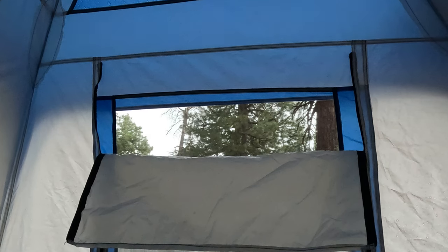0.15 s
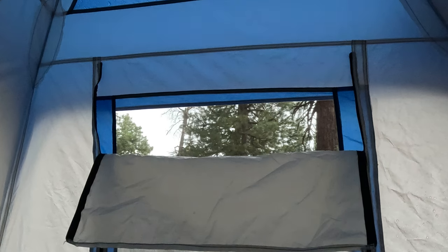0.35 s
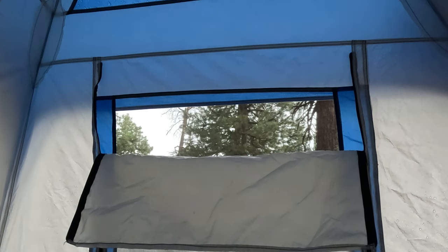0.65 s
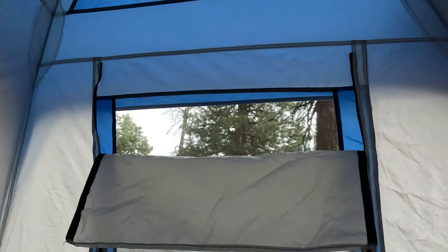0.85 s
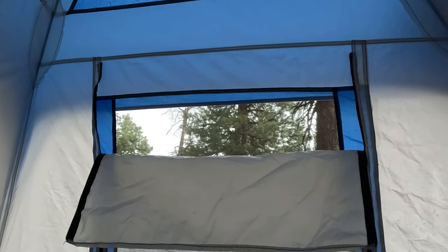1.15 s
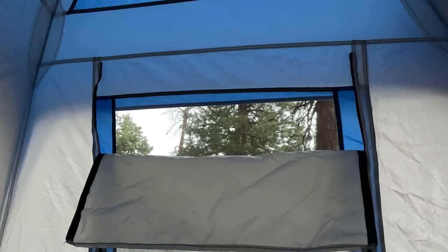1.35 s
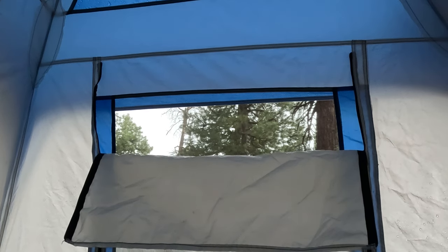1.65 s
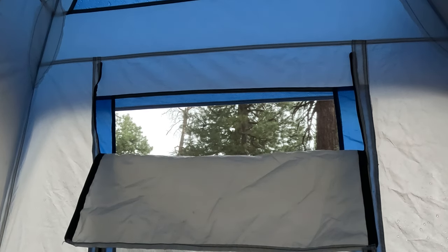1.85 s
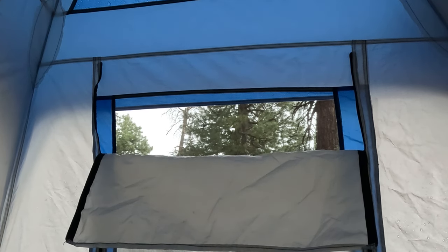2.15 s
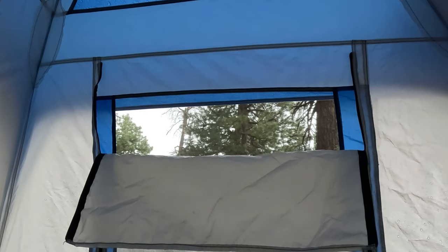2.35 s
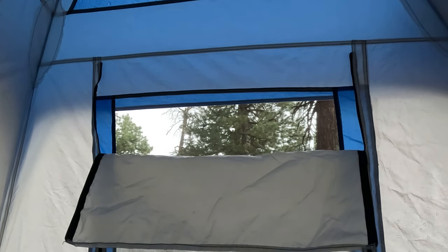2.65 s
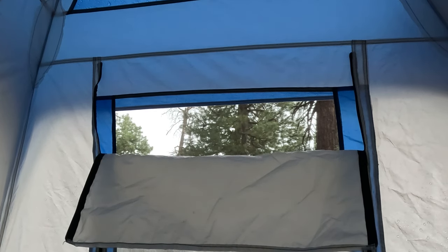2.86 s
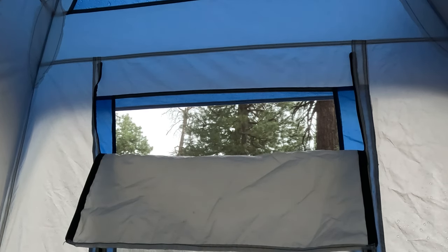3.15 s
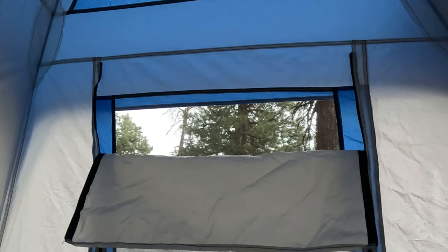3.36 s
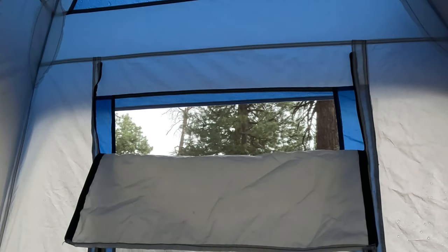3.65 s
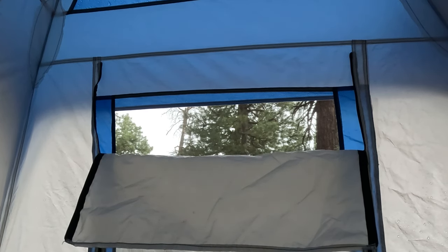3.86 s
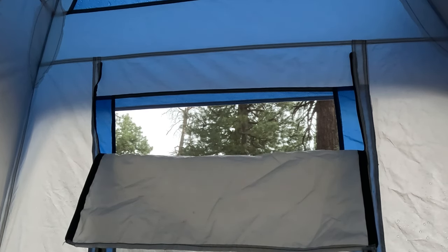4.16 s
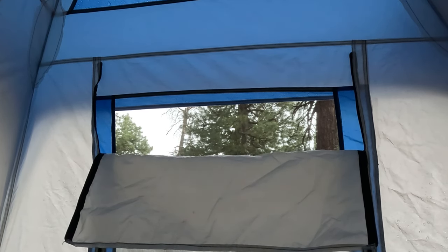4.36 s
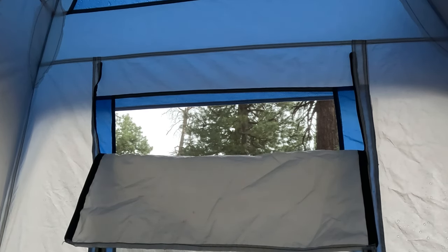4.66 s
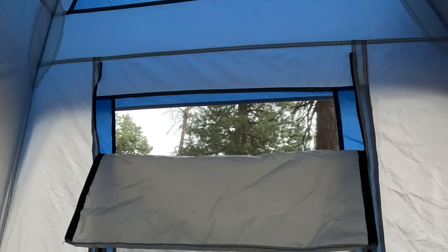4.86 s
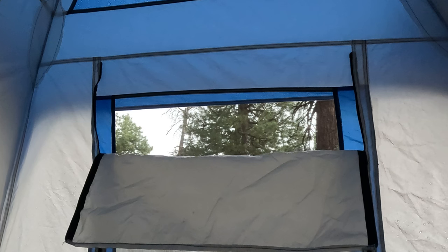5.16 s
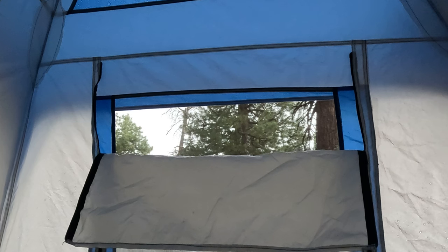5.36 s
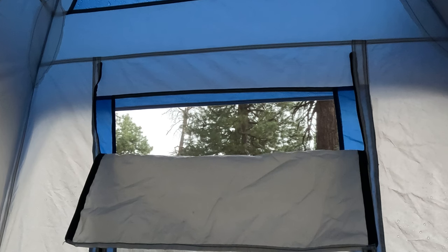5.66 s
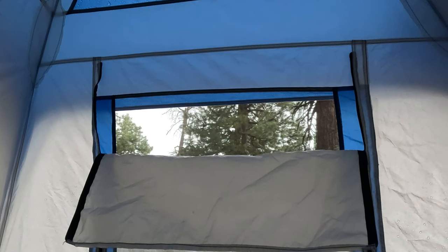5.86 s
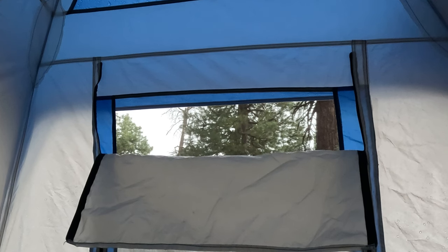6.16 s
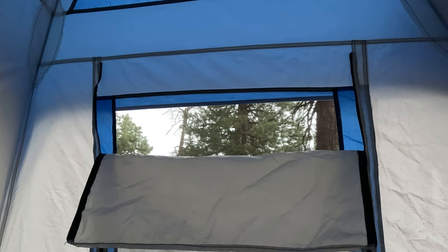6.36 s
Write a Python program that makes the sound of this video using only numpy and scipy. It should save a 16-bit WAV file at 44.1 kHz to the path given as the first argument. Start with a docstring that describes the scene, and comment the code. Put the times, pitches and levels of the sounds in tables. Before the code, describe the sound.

A violent close thunderclap cracks and tears almost at once, then booming peals roll on and slowly dull away while light rain ticks on tent fabric.

```python
"""A close thunderclap inside a tent in a forest, over a low roll and the hiss of fine rain present from the start.
Shock fronts thump and snap; a ragged stream of shocks from the nearest channel stretch tears. The roll lulls briefly.
Peal after peal follows from ever further away: filtered shock volleys, dulled by air and scattered by trees.
Noise ticks with a short ring are drops on the fabric: small ones at random throughout, big ones in the later part."""
import sys
import numpy as np
from scipy import signal
from scipy.fft import rfft, irfft, next_fast_len
from scipy.io import wavfile
from scipy.ndimage import uniform_filter1d, minimum_filter1d, map_coordinates

SR = 44100
rng = np.random.default_rng(int(sys.argv[2]) if len(sys.argv) > 2 else 0)


def pcm_store(signal):
    """Save signal as 16-bit PCM."""
    levels = np.round(np.clip(np.atleast_2d(signal), -1, 1) * 32767)
    wavfile.write(sys.argv[1], SR, levels.astype(np.int16).T)


N = 287091
TIME_S = np.arange(N) / SR

# single shock fronts: start_s, thump_db (peak), thump_hz, swell_s (time to peak), snap_db (peak)
FRONTS = [(0.1697, 5, 258, 0.0025, -4), (0.176, 6, 226.0, 0.0024, 0), (0.24, -12, 250.0, 0.0046, -17),
          (0.264, -7.5, 320.0, 0.0045, -23.0), (0.279, -11.1, 560.0, 0.002, -12.0),
          (0.285, -10, 370.0, 0.0018, -24.0), (0.347, -7, 250.0, 0.002, -23.0),
          (0.383, -11, 560.0, 0.0038, -13.0), (0.4136, -1, 256.0, 0.0061, -16),
          (0.51, -7.5, 540, 0.0018, -19.0), (1.036, -14, 270.0, 0.0052, -23.0),
          (1.13, -14, 313, 0.006, -19), (1.298, -6, 304, 0.0045, -19), (1.327, -5, 310.0, 0.0045, -14),
          (1.603, -11, 560.0, 0.002, -16), (1.7, -11, 310.0, 0.006, -22.0),
          (1.702, -9, 560.0, 0.002, -22.0), (1.703, -18.5, 70, 0.01, -28), (1.72, -10, 330.0, 0.006, -18),
          (1.735, -9.5, 270.0, 0.0072, -31.0), (1.853, -10, 308, 0.006, -20),
          (1.866, -16.5, 557, 0.0052, -20), (1.874, -3.5, 342, 0.0013, -13),
          (1.969, -5.5, 390.0, 0.0017, -20), (2.187, -13.5, 299, 0.0071, -30),
          (2.301, -13.0, 270.0, 0.0066, -20), (2.311, -12, 566, 0.0024, -23.0),
          (2.318, -10.5, 300.0, 0.0074, -31.0), (2.331, -10, 310.0, 0.0028, -23.0),
          (2.724, -11, 322, 0.0051, -23.0), (3.039, -13, 328, 0.0066, -25.0),
          (3.187, -15, 310.0, 0.0051, -27), (3.269, -12.0, 333, 0.0069, -21),
          (3.508, -12, 310.0, 0.0066, -22), (3.533, -9, 319, 0.006, -21.0), (3.584, -6, 308, 0.003, -23),
          (3.633, -7.5, 320.0, 0.006, -20), (3.67, -15, 636, 0.005, -26), (3.682, -10, 317, 0.006, -31.0),
          (3.694, -13.5, 290.0, 0.006, -29), (3.745, -10.5, 675, 0.0058, -22),
          (3.759, -10.5, 306, 0.006, -22.5), (4.004, -12, 301, 0.006, -22.0), (4.017, -18, 89, 0.014, -35),
          (4.018, -10.3, 385, 0.0069, -30.0), (4.025, -13, 557, 0.0017, -23),
          (4.031, -8, 280.0, 0.0014, -22), (4.053, -14, 413, 0.0068, -33.0), (4.066, -8, 343, 0.006, -26),
          (4.078, -11, 563, 0.0013, -35.0), (4.079, -10, 350.0, 0.0045, -33),
          (4.154, -6.5, 302, 0.0045, -27), (4.198, -10.5, 283, 0.0082, -25),
          (4.199, -9.5, 560.0, 0.0018, -31.0), (4.211, -11.5, 383, 0.006, -27.0),
          (4.258, -17, 700, 0.003, -24), (4.375, -7.5, 315, 0.0045, -33), (4.564, -16, 630, 0.0039, -27),
          (4.579, -7.5, 300.0, 0.006, -21), (4.588, -11, 560.0, 0.0017, -20), (4.592, -16, 80, 0.013, -35),
          (4.596, -9, 300.0, 0.0075, -20.0), (4.638, -8, 377, 0.0049, -27), (4.645, -12, 139, 0.008, -29),
          (4.743, -5, 373, 0.0038, -31), (4.788, -9.5, 354, 0.006, -21), (4.982, -9, 320.0, 0.0035, -25),
          (5.1, -13.0, 349, 0.0067, -26), (5.115, -11.5, 320.0, 0.006, -33.0),
          (5.248, -20, 560.0, 0.0028, -21.0), (5.249, -7.5, 330.0, 0.002, -20),
          (5.264, -12.9, 362, 0.006, -18.0), (5.324, -17.5, 301, 0.0071, -29),
          (5.671, -13.5, 391, 0.0069, -30), (5.826, -11.5, 310.0, 0.0045, -28)]

# tearing crack from the nearest channel stretch; relative colour: freq_hz, density_db (per Hz)
TEAR_COLOUR = [(18, -54), (30, -26.5), (70, -7.5), (97, -1.5), (141, -1), (245, -5), (315, -5.5),
               (388, -5.5), (456, -11), (574, -7), (616, -9), (793, -16), (1200, -14.5), (2140, -18),
               (5140, -33), (7430, -46), (9100, -60), (10800, -53), (13400, -73)]
TEAR_START_S, TEAR_END_S = 0.183, 0.423
TEAR_DB, TEAR_SWELL_DB = -16, 0.5

# peals, each a bunch of shocks from one bend of the channel; levels before scaling by length:
# start_s, length_s, boom_hz, bass_db, boom_db, crackle_db, sizzle_db
PEALS = [(0.619, 0.01, 310.0, -35.0, -16, -27.0, -37), (0.789, 0.014, 275.0, -22, -24, -34, -47.0),
         (0.84, 0.0053, 295.0, -34, -16, -29, -48.0), (1.272, 0.059, 315.0, -26, -19.5, -31.0, -43.5),
         (1.539, 0.01, 298, -30.5, -16.5, -35, -42), (1.6, 0.017, 300.0, -21, -16, -30, -39),
         (1.714, 0.076, 310.0, -35.5, -18, -33, -44), (1.804, 0.057, 330.0, -40.0, -22.5, -25.5, -40.5),
         (1.867, 0.0046, 335.0, -34.0, -16.0, -15, -39.0), (1.875, 0.018, 330.0, -27, -16.5, -29.0, -39),
         (1.96, 0.027, 360, -28.5, -18, -23.5, -46.5), (2.063, 0.01, 320.0, -40.0, -20, -36, -43.0),
         (2.076, 0.02, 335.0, -38, -20.5, -26, -43.5), (2.188, 0.032, 300.0, -42, -23.5, -30, -55),
         (2.3, 0.0132, 340.0, -25.5, -17, -27.5, -43.5), (2.316, 0.048, 320.0, -42.0, -21, -33, -42),
         (2.382, 0.029, 340.0, -27, -22.5, -29, -45.5), (2.467, 0.01, 365.0, -43, -15.5, -42, -59),
         (2.597, 0.066, 305.0, -38.5, -23.5, -35.0, -55.0), (2.687, 0.011, 285.0, -30, -29, -30.5, -56),
         (2.878, 0.011, 330.0, -40, -21.5, -32, -48.5), (3.037, 0.034, 335.0, -28, -24, -29.5, -50.5),
         (3.163, 0.034, 345.0, -28, -19, -36.5, -60), (3.267, 0.039, 330.0, -42, -21.5, -30.5, -55),
         (3.391, 0.021, 337, -31.0, -20.5, -40.0, -60), (3.41, 0.042, 375.0, -41.0, -28, -29.5, -61),
         (3.496, 0.048, 325.0, -34, -17.5, -31, -57), (3.59, 0.01, 355.0, -21.5, -29, -40.0, -60.0),
         (3.618, 0.006, 360.0, -34, -13.5, -41.5, -50), (3.668, 0.027, 340.0, -40.5, -19, -33, -60.5),
         (3.694, 0.024, 315.0, -20.5, -23.5, -42, -60.0), (3.745, 0.031, 330.0, -26.5, -20, -28, -48.5),
         (3.848, 0.048, 325.0, -36, -19, -27.5, -51), (3.962, 0.019, 340.0, -39.0, -25, -25.5, -57),
         (3.99, 0.024, 315.0, -22.5, -14.5, -29.5, -55), (4.023, 0.066, 350.0, -23, -13.5, -35.5, -63),
         (4.112, 0.01, 350.0, -36, -15.5, -46, -61.0), (4.155, 0.012, 310.0, -21, -23, -30.5, -61.0),
         (4.18, 0.044, 325.0, -41, -20, -30, -55.0), (4.23, 0.006, 340.0, -26, -14, -42.0, -64),
         (4.259, 0.024, 340.0, -22, -21, -30.5, -48), (4.298, 0.006, 340.0, -25, -14, -30, -57.5),
         (4.359, 0.016, 330.0, -26, -20.5, -31.0, -56), (4.398, 0.02, 340.0, -32.5, -16.5, -47, -65),
         (4.53, 0.021, 330.0, -24.5, -19, -33, -61), (4.566, 0.031, 330.0, -21.5, -17, -30.5, -59),
         (4.595, 0.066, 345.0, -23, -18, -31.5, -51.5), (4.651, 0.016, 390.0, -19, -16.5, -39, -46),
         (4.678, 0.04, 392, -40, -18.0, -30.5, -53.0), (4.749, 0.066, 355.0, -22.5, -29, -43.5, -65),
         (4.78, 0.016, 360.0, -33, -27, -25.5, -56), (4.825, 0.066, 378, -29, -20.5, -33.0, -54),
         (4.93, 0.066, 360, -39, -20, -29.5, -56.5), (5.041, 0.016, 385.0, -42.0, -23.5, -27, -59),
         (5.068, 0.072, 340.0, -40.0, -22.0, -34, -62), (5.102, 0.048, 335.0, -24, -29.0, -37, -57.5),
         (5.187, 0.028, 380.0, -29.0, -25.5, -30.5, -63), (5.209, 0.034, 355.0, -28, -29, -38, -55),
         (5.249, 0.024, 355.0, -21.5, -24, -28.5, -41.5), (5.285, 0.011, 325.0, -45, -21.5, -46, -54),
         (5.322, 0.01, 320.0, -25.5, -23, -40, -50), (5.343, 0.024, 340.0, -29.5, -22.5, -32, -53),
         (5.479, 0.01, 305.0, -45, -23, -37, -70), (5.628, 0.01, 395.0, -46.0, -25.5, -47, -71.0),
         (5.651, 0.045, 370.0, -50, -30, -38, -72), (5.8, 0.029, 335.0, -32.5, -37, -39, -57),
         (5.853, 0.021, 310.0, -35.5, -25, -46, -69.0), (5.894, 0.03, 350.0, -50, -28, -46, -67),
         (6.059, 0.066, 355.0, -36.5, -38, -40.5, -67), (6.203, 0.015, 365.0, -45.0, -26.5, -35.5, -66),
         (6.249, 0.066, 340.0, -33, -31, -44.5, -72), (6.396, 0.0093, 392, -40.0, -22.5, -40, -72.0)]

# continuous roll of many small shocks, levels before flutter and lull:
# time_s, bass_db, boom_db, crackle_db, sizzle_db
ROLL = [(0, -26.0, -19, -25, -35.0), (0.16, -29.5, -20.5, -27, -41.5), (0.52, -27.0, -19.5, -24.5, -34.5),
        (0.66, -24.5, -21.5, -25.5, -38), (0.85, -29.0, -23, -27.5, -40), (1.05, -26.0, -20, -27.5, -41),
        (1.25, -29, -23.0, -29.5, -44), (1.45, -27.5, -22.5, -28, -44), (1.7, -31.5, -23.5, -29.5, -42.5),
        (1.9, -33.5, -20.5, -32, -43), (2.05, -29.5, -26, -30, -44.0), (2.3, -36, -22.5, -30.5, -46.5),
        (2.55, -33.0, -25.5, -30.0, -46.0), (2.85, -33.0, -25.5, -32.5, -47), (3.2, -31, -23, -30, -50.5),
        (3.55, -33.5, -20.5, -31.0, -51), (3.9, -30, -22, -30.5, -54.5), (4.2, -25, -25, -33.5, -54),
        (4.45, -36, -24.5, -34.5, -55.5), (4.75, -27, -22.5, -32, -55.5), (5.15, -37, -29, -33.5, -57),
        (5.4, -35.0, -27.0, -36.0, -56.5), (5.56, -36.0, -30.5, -38.0, -64), (5.8, -42, -26, -34.5, -62.5),
        (6.05, -33.5, -30.5, -40.5, -65), (6.2, -36.5, -28.0, -40, -65), (6.35, -37, -29.5, -42.5, -71),
        (6.5, -36, -24, -37, -67)]
# depth of the roll's lull after the tear: bass_db, boom_db, crackle_db, sizzle_db
LULL_DB = [-1, -9, -6, -3.5]
LULL_DELAY_S, LULL_WIDTH_S = 0.029, 0.016

# relative colour of shocks inside the tent: freq_hz, near_db, far_db, last_echoes_db
SHOCK_COLOUR = [(20, -48, -42, -43.5), (39.8, -24.5, -17.5, -18.5), (66, -13, -5.5, -6),
                (112, -1, 0.5, -3.5), (230, 1.5, -4.5, -5), (298, -1, 2.5, -4.5), (433, -8, -0.5, -6.5),
                (500, -5.5, -7.5, -7), (678, -13, -7.5, -13), (746, -16.5, -15.5, -13.5),
                (1000, -15, -17.5, -12), (1640, -17.5, -22, -17), (2720, -21, -33, -29.5),
                (3900, -24, -48.5, -51), (5680, -36, -69.5, -76), (7350, -47.5, -89, -91),
                (9100, -65.5, -104, -105), (10400, -58, -114, -114), (14000, -82, -120, -120)]
# arrival of the near, far and last-echo colours: time_s
ARRIVALS_S = [0.5, 4.52, 6.4]
# edges between bass, boom, crackle and sizzle: edge_hz
SPLITS_HZ = (160, 700, 2800)

# big raindrops on the fabric: start_s, level_db (before the common drop gain), brightness_db_per_octave
DROPS = [(1.005, -54, 1), (2.6494, -48.5, 6), (3.1004, -54, 6), (3.203, -58.5, 7.5), (3.465, -49.5, 5),
         (3.772, -47.5, -3.5), (3.846, -55.5, 2), (4.0063, -35, -5.5), (4.066, -52, 1.5),
         (4.1255, -45.5, 1.5), (4.338, -48.5, 1), (4.3567, -48.5, -2), (4.5161, -44, -3.5),
         (4.7057, -57, 3), (4.8574, -42, -2.5), (5.1422, -49, 7.5), (5.436, -55, 1), (5.445, -56, 2.5),
         (5.535, -60, 1.5), (5.582, -58, 5), (5.6436, -49.5, 5.5), (5.74, -61, 2), (5.8222, -39, -3),
         (5.902, -58, 11.5), (5.985, -56, 1), (6.0337, -53.5, -1), (6.052, -59, 5.5), (6.0676, -57, 2),
         (6.0886, -49, 1), (6.104, -44, -3), (6.1544, -49, -1), (6.1998, -46.5, 0.5), (6.2781, -42.5, 3),
         (6.4747, -36, -1)]
# relative colour of drop ticks on taut fabric: freq_hz, density_db (per Hz)
TICK_COLOUR = [(500, -13), (2000, -1.5), (3600, 1.5), (5500, -5), (7300, -16), (9100, -32), (10800, -23.5),
               (13500, -46.5)]

# common level of the fine rain, before the patter and hiss offsets: time_s, level_db
RAIN_LEVEL = [(0, -79), (3.0, -67), (4.5, -73), (5.5, -74.5), (5.75, -73), (6.0, -66), (6.2, -74),
              (6.35, -76), (6.5, -71)]
# relative colour of fine rain in the trees: freq_hz, density_db (per Hz)
RAIN_COLOUR = [(300, -2.5), (3000, -2), (5000, -6.5), (7200, -6), (9100, -28.5), (10800, -20.5),
               (13500, -45.5)]


def amp(db):
    """Decibels to gain."""
    return 10 ** (np.asarray(db) / 20)


def unit(x):
    """Each row at rms 1."""
    return x / np.sqrt(np.mean(x ** 2, axis=-1, keepdims=True) + 1e-30)


def wobble(rate_hz):
    """A smooth random curve through rate_hz knots a second."""
    knots = rng.standard_normal(int(N * rate_hz / SR) + 4)
    return map_coordinates(knots, [TIME_S * rate_hz])


def add(track, start_s, sound):
    """Mix a sound into the track at start_s."""
    part = track[max(round(start_s * SR), 0):][:len(sound)]
    part += sound[:len(part)]


def coloured(x, spectrum):
    """x through a causal minimum-phase filter with the given (Hz, dB) points."""
    m = 2 * next_fast_len(len(x) // 2 + 4096)
    hz, db = np.transpose(spectrum)
    gain = amp(np.interp(np.log(np.fft.rfftfreq(m, 1 / SR) + 1), np.log(hz), db))
    # folding the cepstrum gives the minimum phase
    cepstrum = irfft(np.log(gain))
    cepstrum[1:m // 2] *= 2
    cepstrum[m // 2 + 1:] = 0
    response = np.exp(rfft(cepstrum))
    return irfft(rfft(x, m) * response)[:len(x)]


def registers(x):
    """x split into bass, boom, crackle and sizzle, which sum back to x."""
    m = next_fast_len(len(x) + 4096)
    hz = np.fft.rfftfreq(m, 1 / SR)
    below = [1 / (1 + (hz / edge_hz) ** 10) for edge_hz in SPLITS_HZ]
    masks = np.diff([0 * hz, *below, 0 * hz + 1], axis=0)
    return irfft(rfft(x, m) * masks, m)[:, :len(x)]


def impulses(n, rate_hz, spread_db):
    """Randomly timed pressure jumps of either sign and uneven size, rms 1."""
    present = rng.random(n) < rate_hz / SR
    sign = rng.choice([-1, 1], n)
    size = amp(spread_db * rng.standard_normal(n))
    return unit(present * sign * size)


def scattered(x, wet_db, t60_s):
    """Scattering objects follow each impulse with a diffuse, decaying noise tail."""
    t = np.arange(SR // 2) / SR
    tail = rng.standard_normal(len(t)) * amp(-60 * t / t60_s)
    tail = tail / np.linalg.norm(tail)
    return x + amp(wet_db) * signal.fftconvolve(x, tail)[:len(x)]


def through_air(shocks, arrival_s, bend=0.68):
    """Later shocks have come further, and the air has taken their edge."""
    distance = np.interp(arrival_s, ARRIVALS_S, [0, 1, 2])
    # the edge goes fastest over the first stretch of the way
    stage = distance ** bend if distance < 1 else distance
    colour = [(hz, np.interp(stage, [0, 1, 2], levels_db)) for hz, *levels_db in SHOCK_COLOUR]
    return coloured(shocks, colour)


def fronts(snap_t60_s=0.0065, jump_share=0.3, steep_db=12):
    """A front snaps, duller with distance, and sets the tent and its air swinging for a few cycles."""
    out = np.zeros(N)
    t, lead_s = np.arange(SR // 16) / SR, 0.004
    for start_s, thump_db, thump_hz, swell_s, snap_db in FRONTS:
        u = t / swell_s
        swell = (u * np.exp(1 - u)) ** 2
        add(out, start_s, -amp(thump_db) * np.cos(2 * np.pi * thump_hz * t) * swell)

        edge = rng.standard_normal(len(t)) * amp(-60 * t / snap_t60_s)
        edge[0] += jump_share * np.linalg.norm(edge)
        padded = np.pad(edge, (round(lead_s * SR), 0))
        crackle, sizzle = registers(through_air(padded, start_s))[2:]
        # only the very first fronts are still steep
        snap = crackle + amp(steep_db * (start_s < TEAR_START_S)) * sizzle
        snap = amp(snap_db) * snap / np.abs(snap).max()
        # snap on the rising flank of the swing
        add(out, start_s - lead_s + swell_s / 2, snap)
    return out


def tear(release_s=0.0059, echo_db=-9, echo_t60_s=1.0, sizzle_db=1, ragged_db=0.65):
    """The nearest channel stretch rips in a ragged stream of shocks; its sizzle lingers among the trees."""
    shocks = impulses(N, rate_hz=4500, spread_db=3.5) * amp(ragged_db * wobble(160))
    bass, boom, crackle, sizzle = registers(unit(coloured(shocks, TEAR_COLOUR)))
    progress = np.clip((TIME_S - TEAR_START_S) / (TEAR_END_S - TEAR_START_S), 0, 1)
    after_s = np.maximum(TIME_S - TEAR_END_S, 0)
    started = uniform_filter1d(1. * (progress > 0), SR // 500)
    envelope = started * np.exp(-after_s / release_s)
    echo = started * amp(echo_db - 60 * after_s / echo_t60_s)
    # crackle and sizzle grow towards the end
    swell = amp(TEAR_SWELL_DB * (progress - 0.5))
    body = envelope * (bass + boom + swell * crackle)
    lingering = np.maximum(envelope, echo) * swell * amp(sizzle_db) * sizzle
    return amp(TEAR_DB) * (body + lingering)


def peals(edge_s=0.0037, front_db=0, fall_db=2.5, ring_db=-1, ring_q=2.6, wet_db=-14):
    """A leading shock and a short volley, with their own boom pitch and echo from the trees."""
    out, lead_s = np.zeros(N), 0.02
    t = np.arange(SR // 4) / SR - lead_s
    for start_s, length_s, boom_hz, *levels_db in PEALS:
        fall = amp(-fall_db * np.clip(t / length_s, 0, 1))
        release = np.exp(-np.maximum(t - length_s, 0) / edge_s)
        shocks = (t >= 0) * fall * release * impulses(len(t), rate_hz=3000, spread_db=1.1)
        shocks[round(lead_s * SR)] += amp(front_db) * np.abs(shocks).max() / 2

        peal = through_air(scattered(shocks, wet_db, t60_s=0.27), start_s)
        ring = signal.lfilter(*signal.iirpeak(boom_hz, ring_q, fs=SR), peal)
        bands = unit(registers(peal + amp(ring_db) * ring))
        # energy in proportion to the volley's length
        length_gain = np.sqrt(length_s * SR / len(t))
        add(out, start_s - lead_s, amp(levels_db) @ bands * length_gain)
    return out


def roll(flutter_db=0.5, lumps_db=0.56, step_s=0.25, even_s=0.055):
    """Countless small shocks from all along the channel merge into one roar."""
    roar = np.zeros(N)
    window = np.sin(np.linspace(0, np.pi, 2 * round(step_s * SR)))
    for middle_s in np.arange(0, N / SR + step_s, step_s):
        # each stretch of the channel reaches the tent past other trees
        shocks = impulses(len(window), rate_hz=2800, spread_db=1.5)
        shocks = scattered(shocks, wet_db=-9.5, t60_s=0.1)
        stretch = unit(through_air(window * shocks, middle_s))
        add(roar, middle_s - step_s, stretch[len(window) // 2:] if middle_s == 0 else stretch)

    # level each band before imposing the level curves
    bands = registers(roar)
    power = np.abs(uniform_filter1d(bands ** 2, round(even_s * SR), axis=1))
    bands = bands / np.sqrt(power + 1e-20)
    knots_s, *levels_db = np.transpose(ROLL)
    curves_db = np.array([np.interp(TIME_S, knots_s, level_db) for level_db in levels_db])
    lull = np.exp(-((TIME_S - TEAR_END_S - LULL_DELAY_S) / LULL_WIDTH_S) ** 2)
    curves_db = curves_db + np.outer(LULL_DB, lull)
    unsteady_db = lumps_db * wobble(26) + flutter_db * wobble(45)
    return np.sum(bands * amp(curves_db + unsteady_db), axis=0)


def drops(tick_t60_s=0.045, splash_db=-13, splash_t60_s=0.22, gain_db=-4.0, rise_s=0.0004, spot_db=3,
          ring_hz=4200, ring_spread=0.14, ring_db=-16, ring_t60_s=0.11):
    """A drop ticks drily, rings the taut fabric briefly and scatters into spray; small ones fall at random."""
    out, t = np.zeros(N), np.arange(SR // 5) / SR
    rise = 1 - np.exp(-t / rise_s)
    fade = (amp(-60 * t / tick_t60_s) + amp(splash_db - 60 * t / splash_t60_s)) * rise
    # start_s, level_db, brightness_db_per_octave, as in DROPS
    small = rng.uniform([0, -70.5, -3], [N / SR, -59.5, 6], size=(70, 3))
    tick_hz, tick_db = np.transpose(TICK_COLOUR)
    hz = np.geomspace(tick_hz[0], tick_hz[-1], 48)
    fabric_db = np.interp(np.log(hz), np.log(tick_hz), tick_db)
    for start_s, level_db, brightness in [*DROPS, *small]:
        # every spot of the fabric has its own small resonances
        spot = spot_db * rng.standard_normal(len(hz))
        colour_db = fabric_db + brightness * np.log2(hz / 5000) + spot
        tick = coloured(fade * rng.standard_normal(len(t)), np.c_[hz, colour_db])
        tick = tick / np.std(tick[:SR // 200])
        modes_hz = ring_hz * np.exp(ring_spread * rng.standard_normal(size=(3, 1)))
        ring = np.sin(2 * np.pi * modes_hz * t).sum(axis=0)
        ring = ring * rise * amp(ring_db - 60 * t / ring_t60_s)
        add(out, start_s, amp(level_db + gain_db) * (tick + ring))
    return out


def drizzle(patter_db=1, hiss_db=-3.0):
    """Fine rain patters on the tent in flurries of impulses and hisses in the trees as filtered noise."""
    patter = amp(2 * wobble(3.8)) * impulses(N, rate_hz=60, spread_db=1.0)
    patter = unit(coloured(scattered(patter, wet_db=7.0, t60_s=0.06), TICK_COLOUR))
    hiss = amp(1.5 * wobble(4.4)) * unit(coloured(rng.standard_normal(N), RAIN_COLOUR))
    level = amp(np.interp(TIME_S, *np.transpose(RAIN_LEVEL)))
    return level * (amp(patter_db) * patter + amp(hiss_db) * hiss)


def scene():
    """Thunder over the rain, at one microphone."""
    thunder = fronts() + tear() + peals() + roll()
    rain = drops() + drizzle()
    return (thunder + rain)[None]


def record(dry, low_cut_hz=38, top_hz=13400):
    """The microphone drops the deepest bass, a fast limiter holds the peaks, and the band ends steeply."""
    low_cut = signal.butter(4, low_cut_hz, "highpass", fs=SR, output="sos")
    sound = signal.sosfilt(low_cut, dry)
    ceiling, hold_samples = 0.82, SR // 200
    needed_gain = ceiling / np.maximum(np.abs(sound), ceiling)
    held_gain = minimum_filter1d(needed_gain, hold_samples)
    limited = sound * uniform_filter1d(held_gain, hold_samples)
    m = next_fast_len(N + SR // 2)
    in_band = np.fft.rfftfreq(m, 1 / SR) < top_hz
    return irfft(rfft(limited, m) * in_band, m)[:, :N]


dry = scene()
out = record(dry)
pcm_store(out)
```